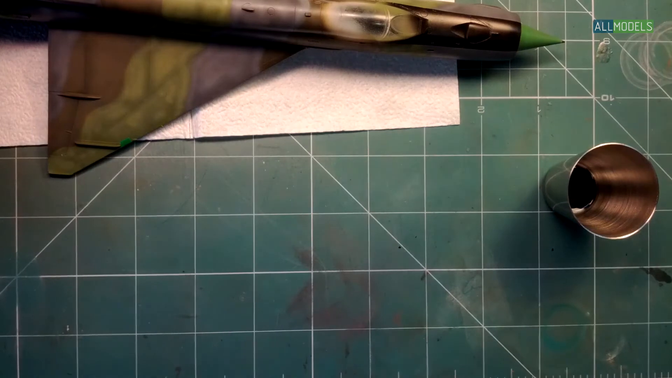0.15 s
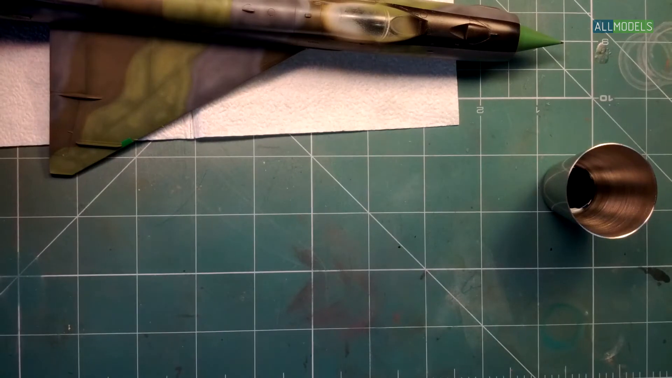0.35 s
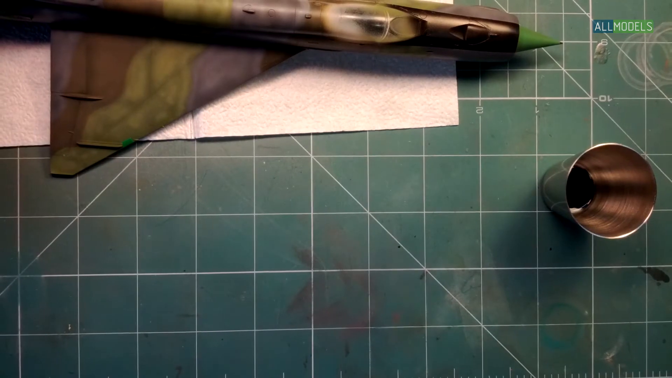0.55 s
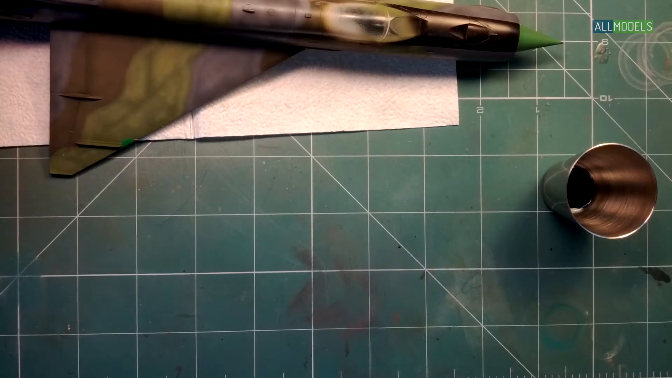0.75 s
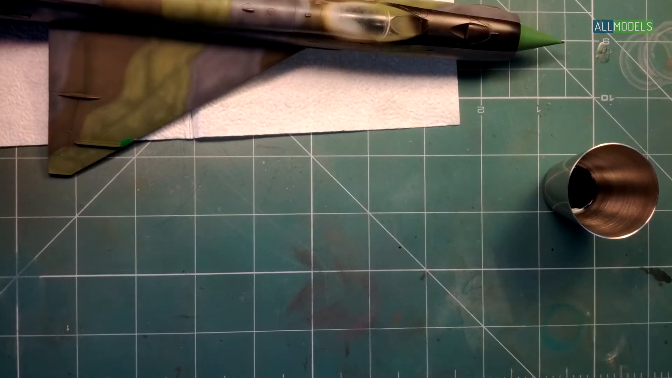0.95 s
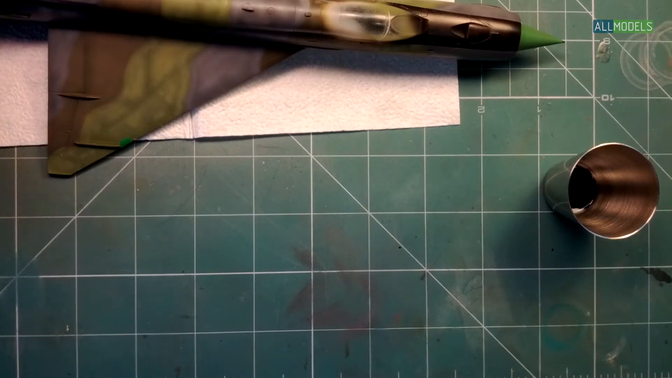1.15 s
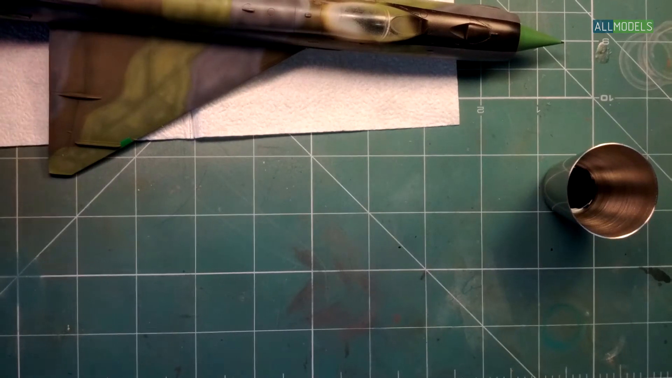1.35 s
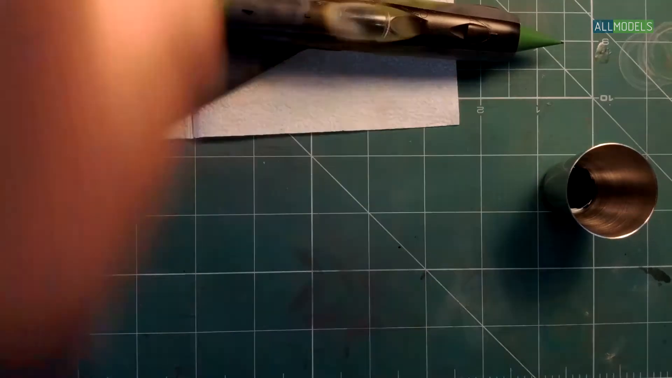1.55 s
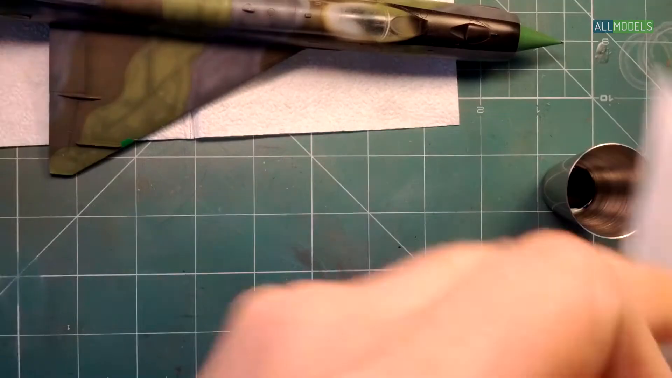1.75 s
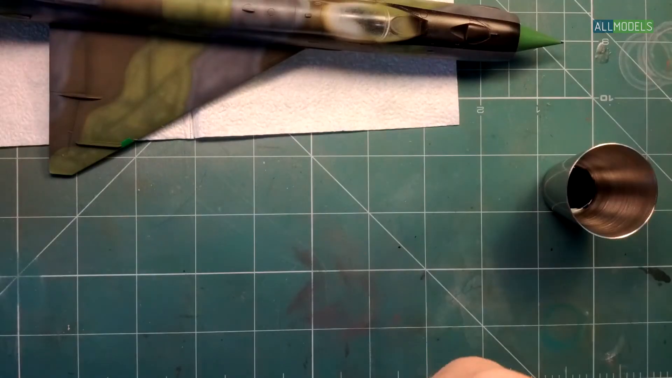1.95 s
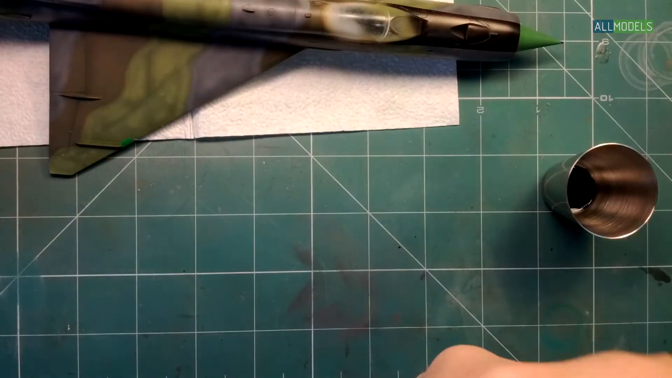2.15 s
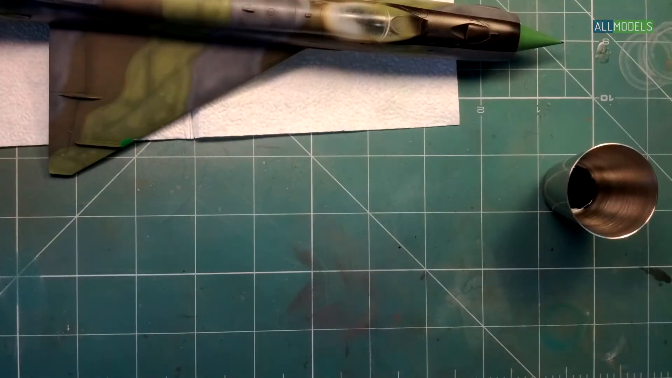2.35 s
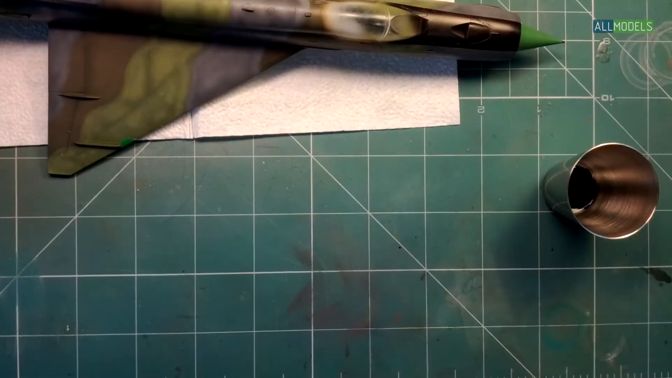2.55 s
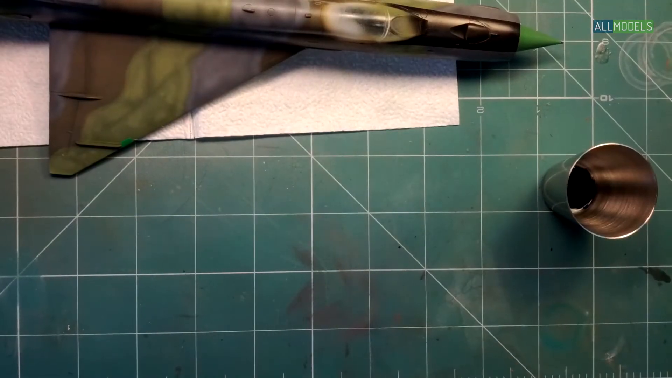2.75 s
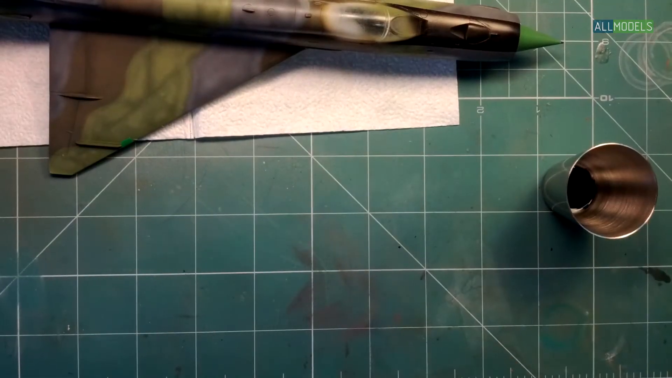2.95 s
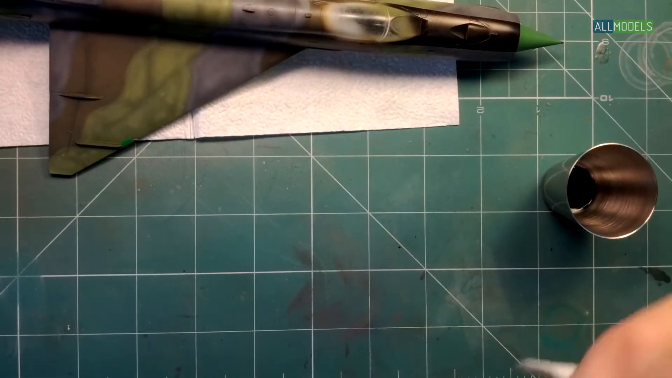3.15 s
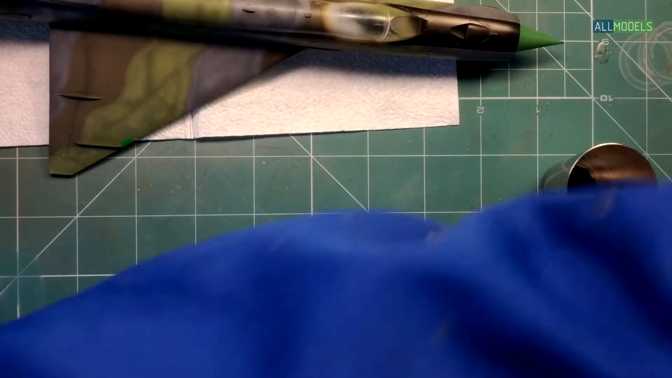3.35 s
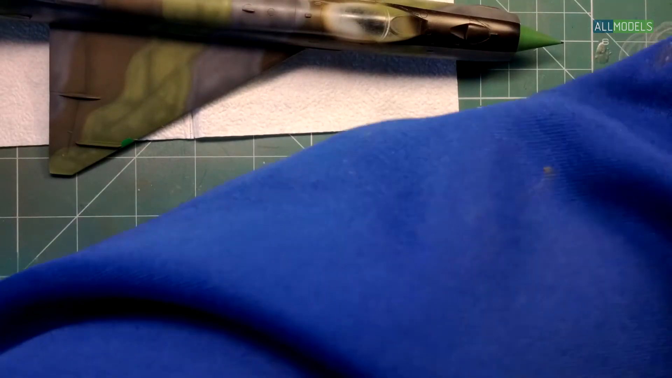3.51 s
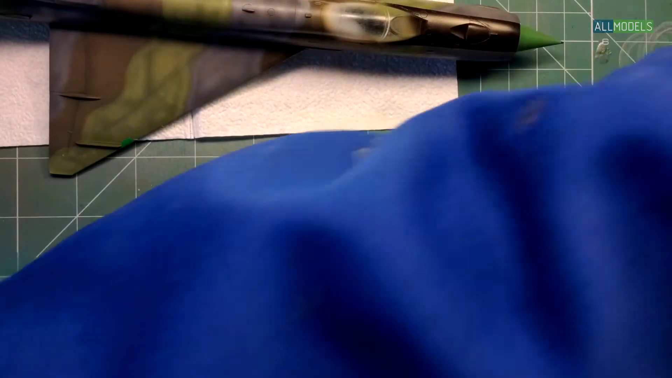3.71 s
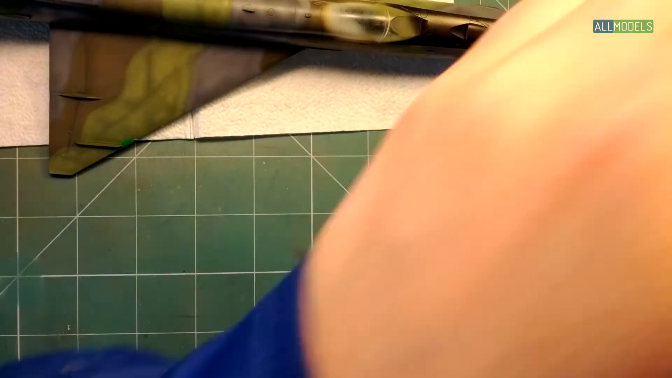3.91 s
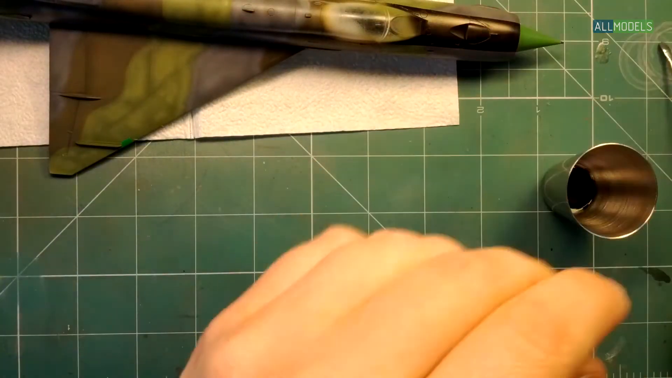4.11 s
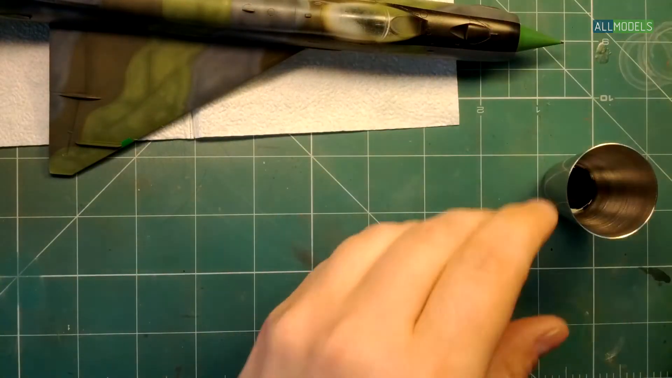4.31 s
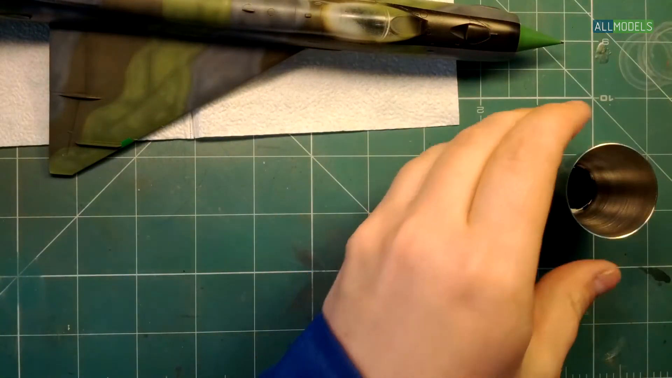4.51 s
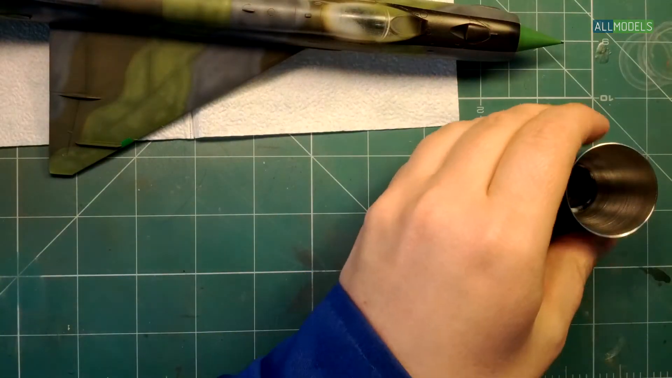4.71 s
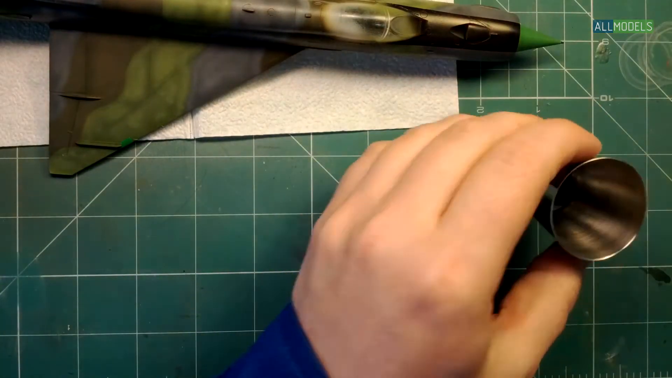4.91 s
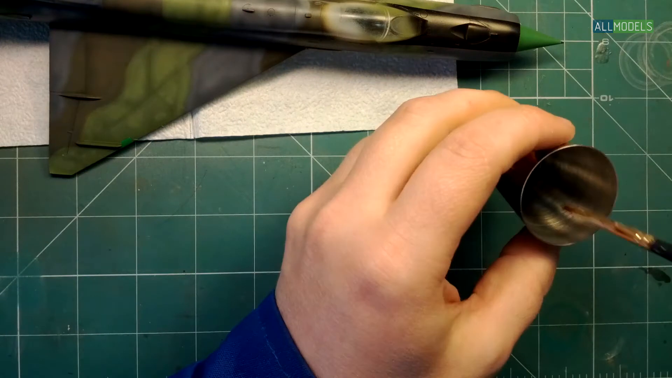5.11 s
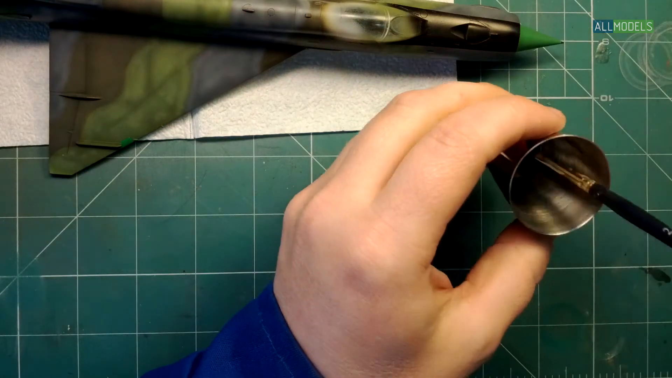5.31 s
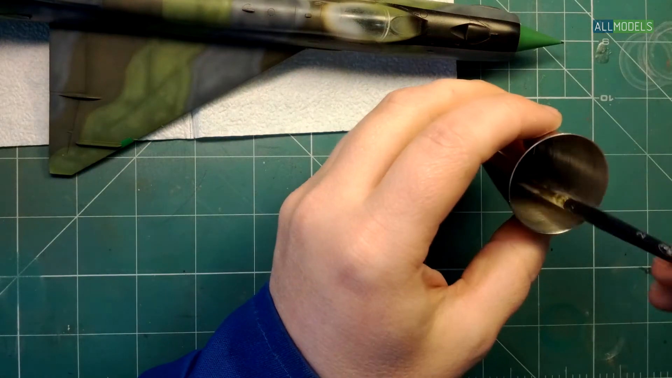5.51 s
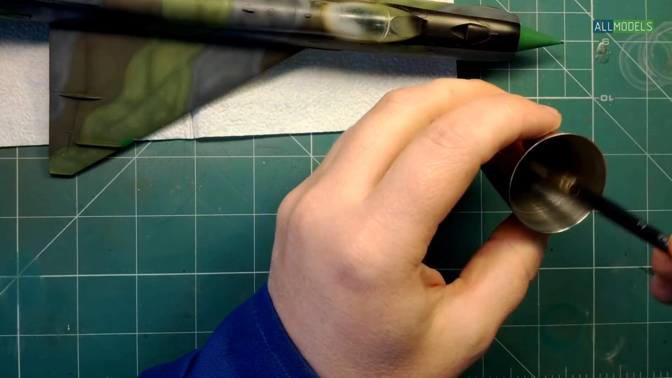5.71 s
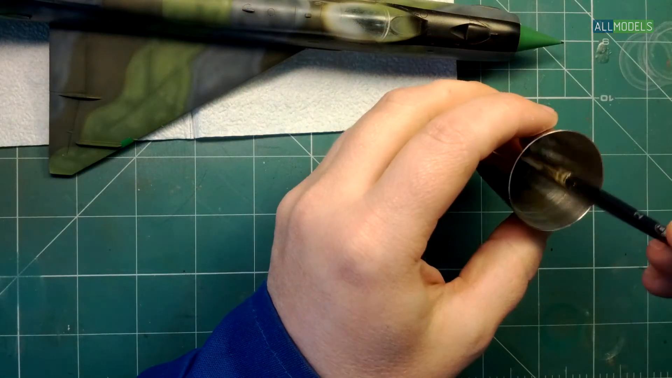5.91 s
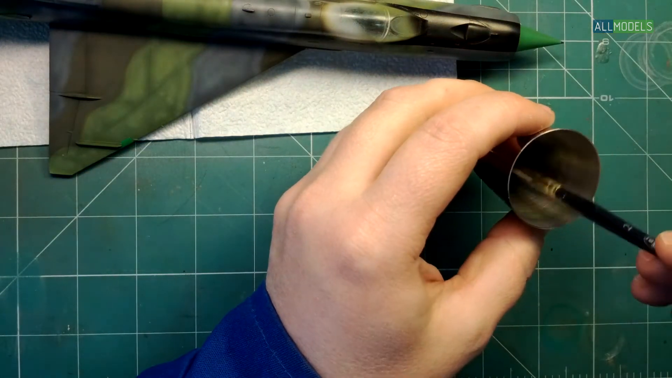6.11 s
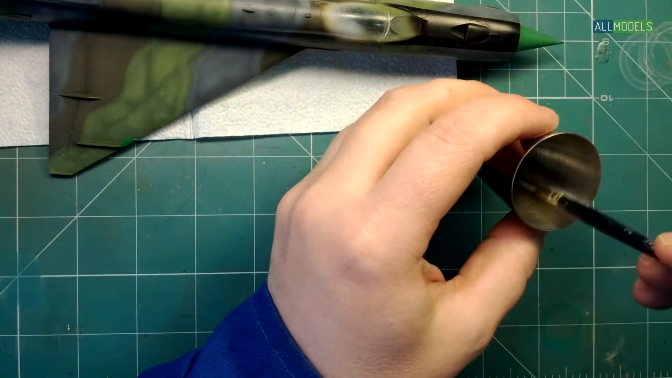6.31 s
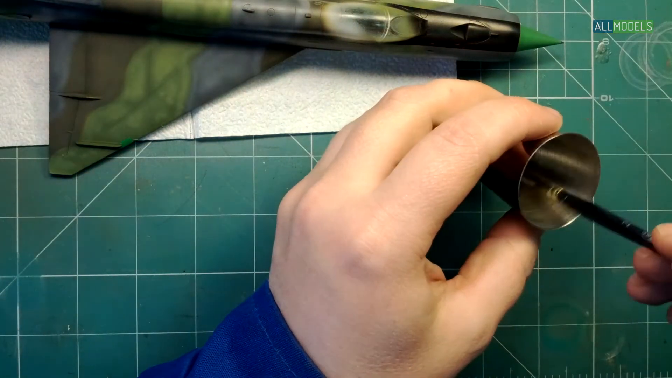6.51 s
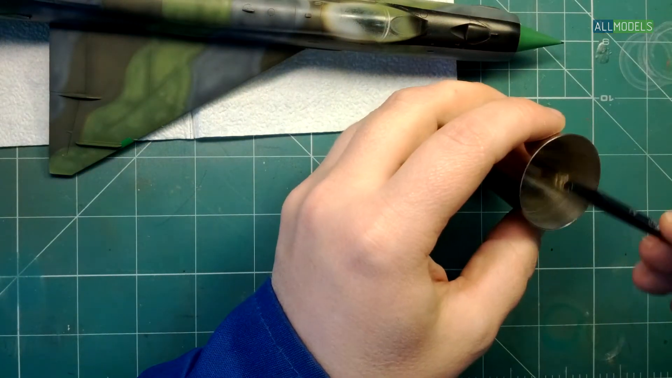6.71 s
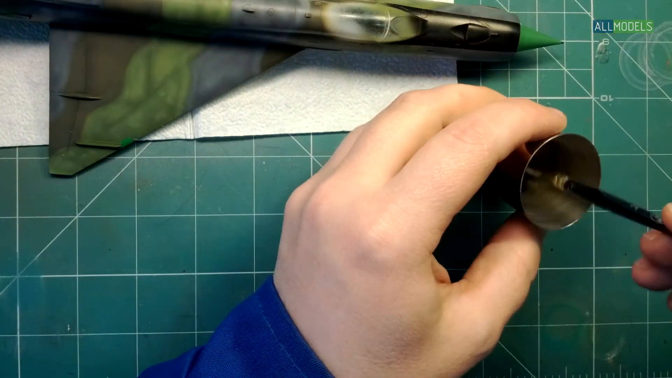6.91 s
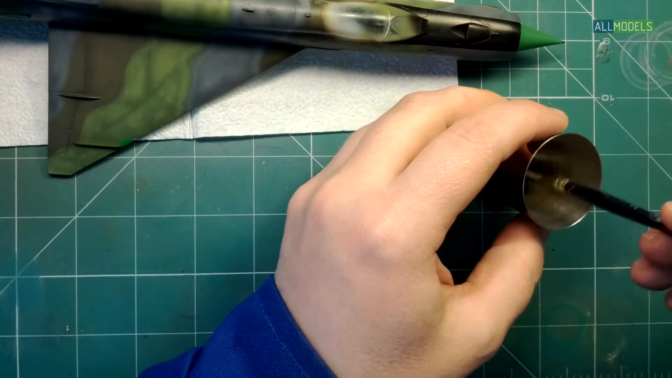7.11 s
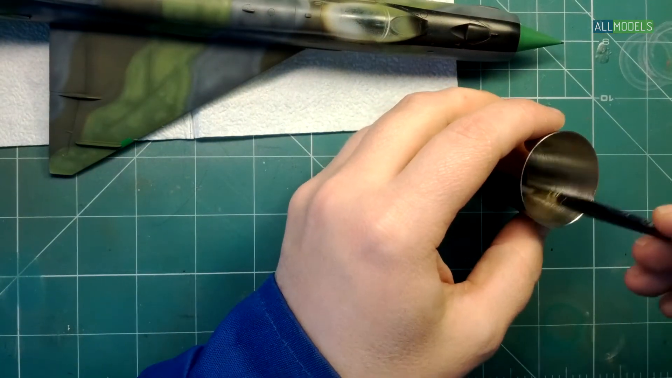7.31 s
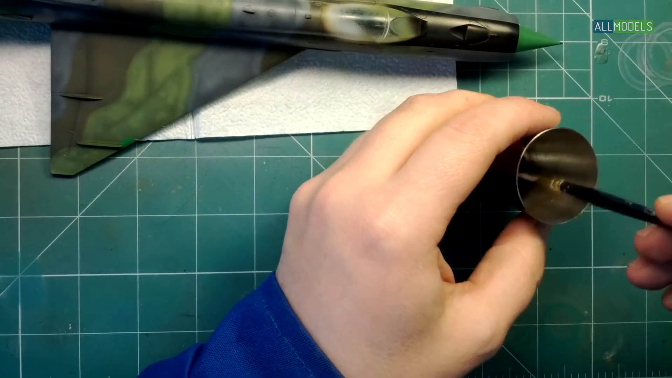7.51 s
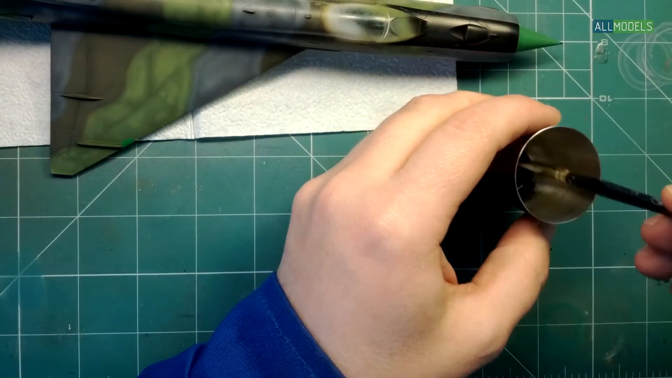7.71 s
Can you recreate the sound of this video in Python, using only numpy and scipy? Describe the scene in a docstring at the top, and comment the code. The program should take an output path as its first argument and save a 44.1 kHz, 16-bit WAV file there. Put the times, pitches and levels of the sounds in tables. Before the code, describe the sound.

Faint rustles and clicks, a tool bouncing on a desktop, then scratchy brush strokes with light clinks in a metal cup.

```python
"""A hobby desk in a quiet room. Paper and sleeves rustle, a small box slides over the mat, handled things
snap, and leaning arms set the desk humming. At 3.7 s a small tool drops and bounces: the desk rings, the
tool rattles, its steel tip pings. From 5.1 s a brush scrubs round a hand-held steel cup: slipping bristles
excite the wall and the ferrule ticks against it. Near 6 s a chair joint slips with a faint creak."""
import sys
import numpy as np
from scipy import signal
from scipy.fft import rfft, irfft
from scipy.io import wavfile
from scipy.ndimage import uniform_filter1d

SR = 44100
rng = np.random.default_rng(int(sys.argv[2]) if len(sys.argv) > 2 else 0)


def waveform_to_disk(signal):
    """Save audio, clipped to [-1, 1], as 16-bit WAV at the path in sys.argv[1]."""
    frames = np.transpose(np.atleast_2d(signal))
    scaled = np.clip(frames, -1, 1) * 32767
    samples = np.round(scaled).astype(np.int16)
    wavfile.write(sys.argv[1], SR, samples)


N = 342216

# steel cup wall modes: f/Hz, width/Hz, gain/dB
CUP_MODES = [(1815, 170, -21.5), (5230, 920, -12), (5490, 340, 2), (5690, 200, -0.5), (7000, 430, -26.5),
             (10800, 850, -9), (10916, 230, 4), (11206, 290, 4.5), (11750, 400, -11)]


def gain(db):
    return 10 ** (np.asarray(db) / 20)


def unit_rms(x):
    return x / np.sqrt(np.mean(x ** 2) + 1e-20)


def add(mix, start_s, sound):
    part = mix[round(start_s * SR):][:len(sound)]
    part += sound[:len(part)]


def log_interp(points, hz):
    """Interpolates (f/Hz, value) points over log frequency."""
    points_hz, values = np.transpose(points)
    return np.interp(np.log(hz + 1), np.log(points_hz + 1), values)


def coloured(x, spectrum):
    """x filtered by (f/Hz, level/dB) points, rms 1."""
    hz = np.fft.rfftfreq(len(x), 1 / SR)
    return unit_rms(irfft(rfft(x) * gain(log_interp(spectrum, hz)), len(x)))


def envelopes(gestures):
    """One power-summed gain curve per level column. Full at t; rise and fall each span 25 dB."""
    t, power = np.arange(N) / SR, 0
    for full_s, rise_s, hold_s, fall_s, *levels_db in gestures:
        ramp = np.minimum((t - full_s) / rise_s, (full_s + hold_s - t) / fall_s)
        shape_db = np.clip(25 * ramp, -200, 0)
        power = power + gain(np.add.outer(levels_db, shape_db)) ** 2
    return np.sqrt(power)


def grit(rate_hz, spread_db):
    """Tiny slips at random times, a few much larger than the rest."""
    size = gain(spread_db * np.minimum(rng.exponential(1, N), 4))
    return size * rng.standard_normal(N) * (rng.random(N) < rate_hz / SR)


def clumps(spread_db, samples):
    """Random gain: friction comes in uneven bunches."""
    return gain(spread_db * unit_rms(uniform_filter1d(rng.standard_normal(N), samples)))


def resonate(x, modes):
    """Parallel resonances (f/Hz, width/Hz, gain/dB), each applied twice for steep flanks."""
    out = np.zeros(N)
    for hz, width_hz, db in modes:
        r = np.exp(-np.pi * width_hz / SR)
        section = [1 - r, 0, r - 1, 1, -2 * r * np.cos(2 * np.pi * hz / SR), r * r]
        out += gain(db) * signal.sosfilt([section, section], x)
    return out


def ring(modes, detune=0.):
    """Decaying sines of a struck body, peak 1; each blow lands elsewhere, so the modes scatter."""
    scatter_db, attack_s = 2.5, 0.0006
    t, x = np.arange(SR // 2) / SR, 0
    for hz, db, t60_s in modes:
        db += scatter_db * rng.standard_normal()
        hz *= 1 + detune * rng.standard_normal()
        x = x + gain(db - 60 * t / t60_s) * np.sin(2 * np.pi * hz * t)
    x *= 1 - np.exp(-t / attack_s)
    return x / abs(x).max()


def crack(spectrum, t60_s):
    """Noise burst standing for many short modes, peak 1."""
    t = np.arange(4096) / SR
    x = coloured(rng.standard_normal(len(t)), spectrum) * gain(-60 * t / t60_s)
    return np.pad(x / abs(x).max(), (0, SR // 2 - len(t)))


def brush_scrub():
    """Bristles slip over steel, hiss and excite the cup wall; they drag lightly between strokes."""
    # t/s, rise/s, hold/s, fall/s, drive/dB, upper modes re drive/dB, hiss re drive/dB
    strokes = [(5.166, 0.038, 0.0083, 0.012, -52.5, 5, -4), (5.248, 0.0039, 0.031, 0.024, -49.5, 13.5, 0),
               (5.371, 0.016, 0.026, 0.038, -48.5, -5, -2), (5.408, .03, 0.013, 0.04, -55, 8, -12),
               (5.452, 0.022, 0.067, 0.032, -47, 2, -2), (5.59, 0.059, 0.03, 0.064, -44.5, 0, -4.5),
               (5.78, 0.02, 0.019, 0.074, -42, -0.5, -5), (5.982, 0.031, 0.037, 0.021, -49, 7.5, 0.5),
               (6.095, 0.025, 0.026, 0.063, -48, 3.5, -3.5), (6.172, .05, 0.065, .03, -65.5, 6, 5.5),
               (6.301, 0.021, 0.046, 0.018, -49, 6.5, -3.5), (6.373, .03, 0.086, 0.071, -67.5, 13.5, 8),
               (6.506, 0.025, 0.1, 0.066, -50, 7, -2.5), (6.714, 0.053, 0.021, 0.048, -48, 5, -3),
               (6.775, .04, .05, 0.059, -67, 11.5, 3), (6.877, 0.029, 0.011, 0.036, -45, 0.5, -5.5),
               (6.982, .05, 0.026, 0.057, -61.5, 9, 1), (7.077, 0.023, 0.017, 0.015, -52.5, 11.5, 0),
               (7.191, 0.11, 0.043, .05, -63.5, 9.5, 2.5), (7.25, 0.046, 0.031, 0.037, -48, 0, -4),
               (7.41, 0.053, .035, .08, -54, 6, -4), (7.622, 0.029, 0.025, 0.06, -45, 3.5, -4)]
    bristle_spectrum = [(3000, -28), (4500, -30), (6500, 0.5), (7800, -4.5), (9300, 1), (12500, 4),
                        (14000, 2.5), (16000, -3)]  # f/Hz, level/dB
    drag_db, drag_from_s = (-78, -90, -74), 5.12  # drive floor: lower modes, upper modes, hiss
    drive = envelopes([(*timing, db, db + upper_db, db + hiss_db)
                       for *timing, db, upper_db, hiss_db in strokes])
    drag = np.outer(gain(drag_db), np.arange(N) / SR > drag_from_s)
    lower_drive, upper_drive, hiss_drive = np.maximum(drive, drag)
    slips = unit_rms(grit(rate_hz=14000, spread_db=1.04) * clumps(spread_db=2.8, samples=200))
    lower = gain(14) * resonate(lower_drive * slips, CUP_MODES[:5])
    upper = gain(10) * resonate(upper_drive * slips, CUP_MODES[5:])
    hiss = gain(2.5) * hiss_drive * coloured(slips, bristle_spectrum)
    return lower + upper + hiss


def ferrule_ticks():
    """The ferrule hits the cup: a bright crack and a small thud, both ringing the wall."""
    hits = [(5.0748, -32, -5.5), (5.177, -39.5, -10), (5.249, -30, -43), (5.9897, -40, -17),
            (6.0357, -21.5, -32), (6.198, -40, -25), (6.2518, -29, -40), (6.4147, -27, -22.5),
            (6.421, -29, -21), (6.4357, -33, -34), (6.545, -42, -35), (6.556, -44, -34),
            (7.667, -15, -29.5)]  # t/s, level/dB, thud re level/dB
    ferrule_spectrum = [(1760, -67), (3000, -35.5), (5740, -14.5), (6300, -10), (6810, -19), (8320, -11),
                        (9130, -4), (12100, -12), (13600, -3.5), (14400, -2), (16500, -33)]  # f/Hz, level/dB
    thud_modes = [(960, -8, 0.015), (1840, 0, 0.02), (2600, -6, 0.014), (3300, 0, 0.012), (4200, -3, 0.012)]  # cup in the hand: f/Hz, level/dB, t60/s
    out = np.zeros(N)
    for start_s, db, thud_db in hits:
        tick = crack(ferrule_spectrum, t60_s=0.022)
        thud = gain(thud_db) * ring(thud_modes, detune=0.04)
        add(out, start_s, gain(db) * (tick + thud))
    return out + gain(-5.5) * resonate(out, CUP_MODES)


def tool_drop():
    """Each blow rings the desk and cracks and rattles the tool; its steel tip pings."""
    blows = [(3.687, -20, -5.5, -16), (3.7013, -22, -27, -21), (3.9116, -15, 11, -5.5),
             (3.969, -26, 7.5, 1.5), (3.974, -25, 0, -2), (3.982, -39.5, 14.5, 11), (4.0032, -24.5, 1, -10),
             (4.0472, -26, -14, -15), (4.0594, -35.5, -4, -14), (4.0742, -33, -4.5, -9),
             (4.1051, -40, -8, -7.5)]  # t/s, level/dB, crack re level/dB, rattle re level/dB
    desk_modes = [(93.1, -22, 0.059), (148, -24, 0.048), (240, -22.5, 0.077), (299, -26, 0.34),
                  (690, -17, .05), (1277, -24, 0.016), (1325, -4.5, 0.036), (1406, 0.5, 0.017),
                  (1630, -3, .03), (1795, -8, 0.035), (1950, 2.5, 0.018), (2094, -4, 0.019),
                  (2285, -1.5, 0.01)]  # f/Hz, level/dB, t60/s
    rattle_modes = [(3345, -4, .015), (3250, -2.5, .02), (3520, -10.5, 0.054), (3927, -8, 0.017)]  # f/Hz, level/dB, t60/s
    tool_spectrum = [(1470, -27), (2500, -4), (4560, -8), (5640, 2), (7320, -6), (8240, 2), (9270, -6),
                     (11200, 0.5), (12400, -5.5), (15600, -19), (16500, -30.5)]  # f/Hz, level/dB
    tip_pings = [(3.9125, -41, 13580, .13), (3.982, -47, 11150, .3), (4.003, -58, 13580, .16)]  # t/s, level/dB, f/Hz, t60/s
    out = np.zeros(N)
    for start_s, db, crack_db, rattle_db in blows:
        contact = gain(crack_db) * crack(tool_spectrum, t60_s=0.012)
        rattle = gain(rattle_db) * ring(rattle_modes, detune=0.02)
        desk = ring(desk_modes, detune=0.024)
        add(out, start_s, gain(db) * (desk + contact + rattle))
    for start_s, db, hz, t60_s in tip_pings:
        add(out, start_s, gain(db) * ring([(hz, 0, t60_s)]))
    return out


def rustle(bunches):
    """Paper and cloth: clumped crackle over a smoother, duller rubbing."""
    # t/s, rise/s, hold/s, fall/s, crackle/dB, treble re crackle/dB, rubbing/dB
    gestures = [(0.054, 0.28, 0.081, .1, -97, -2, -62), (0.145, 0.018, .01, 0.21, -60, -10, -43.5),
                (0.257, 0.095, 0.055, 0.16, -60, 4.5, -58), (0.465, 0.1, 0.15, 0.096, -52, 1.5, -56),
                (0.67, 0.055, 0.012, 0.48, -66.5, 6.5, -62), (0.964, 0.11, 0.049, 0.11, -59, 2, -60),
                (1.088, 0.079, 0.11, 0.063, -63, 6, -60.5), (1.316, 0.21, 0.044, 0.47, -61.5, 5, -62.5),
                (1.595, 0.086, 0.027, 0.078, -45.5, 6, -56), (1.721, 0.1, 0.031, 0.18, -50, 8.5, -61.5),
                (1.9, 0.081, 0.018, 0.18, -48, 7, -63), (2.061, 0.28, 0.044, 0.33, -58, 4.5, -66.5),
                (2.332, 0.14, 0.013, .3, -63.5, 8, -70), (2.486, .2, .04, .15, -66.5, 2, -67),
                (2.789, 0.045, 0.02, 0.09, -56, 3.5, -66.5), (2.856, 0.064, 0.015, .1, -52, 4.5, -57.5),
                (2.94, 0.12, .08, .2, -66, 7, -74), (3.07, 0.13, 0.095, 0.11, -59.5, 4, -70),
                (3.265, 0.12, 0.039, 0.22, -61, 3.5, -66), (3.433, 0.1, 0.013, 0.085, -59, 2.5, -75),
                (3.53, .1, 0.16, 0.078, -68, -1, -75)]
    crackle_spectrum = [(530, -18.5), (900, -15), (1130, -8.5), (2140, -8.5), (2350, -7), (3920, -5.5),
                        (12900, -4), (15700, -4.5), (16500, -25)]  # f/Hz, level/dB
    rubbing_spectrum = [(88, -22), (150, -10), (338, -0.5), (385, 1.5), (595, 1.5), (1180, -3), (2150, -15),
                        (2500, -22), (3250, -20), (5500, -120)]  # f/Hz, level/dB
    body_gain, treble_gain, rubbing_gain = envelopes(
        [(*timing, db, db + treble_db, rubbing_db) for *timing, db, treble_db, rubbing_db in gestures])
    crackle = coloured(grit(rate_hz=9000, spread_db=1.3) * bunches, crackle_spectrum)
    body = signal.sosfilt(signal.butter(2, 7000, fs=SR, output="sos"), crackle)
    rubbing = coloured(rng.standard_normal(N) * bunches, rubbing_spectrum)
    return body_gain * unit_rms(body) + treble_gain * unit_rms(crackle - body) + rubbing_gain * rubbing


def handling_snaps():
    """Handled things snap: short bursts, steep below their centre, spreading above."""
    snaps = [(0.143, -61, 670, 0.014), (0.8224, -47, 3800, 0.009), (0.442, -42, 6000, .012),
             (0.598, -39, 5500, .012), (0.9155, -40, 10000, .008), (0.9528, -35.5, 8150, 0.0093),
             (0.966, -35, 11000, .008), (0.97, -25, 12500, .008), (1.01, -35, 12500, .012),
             (1.027, -36, 12500, .012), (1.052, -38, 12000, .012), (1.1644, -38.5, 5440, 0.02),
             (1.198, -45, 1500, 0.012), (1.8912, -24, 9600, 0.015), (2.0754, -34.5, 7400, 0.026),
             (2.162, -44, 8600, 0.015), (2.2213, -49, 1450, 0.011), (2.236, -47, 3040, 0.021),
             (2.487, -49, 1180, 0.017), (2.589, -39, 676, 0.02), (2.622, -36.5, 725, 0.023),
             (2.639, -43, 730, 0.015), (2.669, -40.5, 690, 0.024), (2.744, -42.5, 670, 0.022),
             (2.794, -34.5, 9350, 0.018), (2.8709, -32, 9400, 0.021), (3.0545, -41, 9500, 0.015),
             (3.273, -35.5, 1870, 0.013), (3.3824, -56, 1660, 0.012), (3.6058, -30, 9600, 0.022),
             (4.406, -45, 1300, 0.015), (5.799, -58, 935, 0.04), (5.831, -46.5, 650, 0.018)]  # t/s, level/dB, f/Hz, t60/s
    out = np.zeros(N)
    for start_s, db, hz, t60_s in snaps:
        spectrum = [(hz / 3.2, -35), (hz / 0.95, 0), (hz * 1.6, -4), (hz * 3.4, -20)]
        add(out, start_s, gain(db) * crack(spectrum, t60_s))
    return out


def box_slide(bunches):
    """Friction on the mat excites a small box."""
    slide = [(.47, 0.044, 0.138, 0.036, -53)]  # t/s, rise/s, hold/s, fall/s, level/dB
    box_modes = [(1160, 120, -4.5), (2430, 110, -3.5), (3870, 330, 0), (4370, 200, -3), (5000, 150, -9.5)]  # f/Hz, width/Hz, gain/dB
    slips = grit(rate_hz=3000, spread_db=2.3) * bunches
    return envelopes(slide)[0] * unit_rms(resonate(slips, box_modes))


def desk_hum():
    """Arms moving on the desk top drive its low modes with noise."""
    arm_moves = [(1.0, 0.1, 0.29, 0.6, -61.5), (2.12, .15, 0.045, .12, -69.5),
                 (2.46, 0.23, 0.42, .15, -66.5), (3.22, 0.38, 0.097, .15, -69),
                 (3.46, .08, 0.013, 0.065, -59), (3.62, 0.084, 0.85, 0.34, -66),
                 (4.7, 0.15, 0.28, 0.37, -73.5), (5.17, .15, .12, .15, -82),
                 (5.47, 0.092, 0.022, 0.071, -71)]  # t/s, rise/s, hold/s, fall/s, level/dB
    hum = resonate(rng.standard_normal(N), [(287, 83, -5), (240, 66, -9)])
    return envelopes(arm_moves)[0] * unit_rms(hum)


def chair_creak():
    """A joint slips at an uneven pace; a weaker slip follows each one."""
    pushes = [(6.02, 0.11, 0.22, 0.059, -66.5), (6.3, .04, .36, 0.22, -65.5)]  # t/s, rise/s, hold/s, fall/s, level/dB
    chair_modes = [(398, 9, 0.075), (556, 10, 0.06), (671.5, 6.5, 0.11), (810, -33, 0.017)]  # f/Hz, level/dB, t60/s
    mean_rate_hz, follow_s = 50, 0.00812
    rate_hz = mean_rate_hz * (1 + 0.55 * uniform_filter1d(rng.standard_normal(N), 400))
    slip_count = np.floor(np.cumsum(rate_hz) / SR)
    slips = (np.diff(slip_count, prepend=0) > 0) * gain(1.6 * rng.standard_normal(N))
    slips += 0.47 * np.roll(slips, round(follow_s * SR))
    creak = signal.oaconvolve(slips, ring(chair_modes))[:N]
    return envelopes(pushes)[0] * unit_rms(creak)


def room_echoes(x):
    """Sparse reflections of random sign, each band dying at its own rate."""
    decay = [(200, 0.44), (660, 0.63), (1500, 0.44), (2500, .3), (3500, 0.23), (10000, 0.1), (16000, 0.34)]  # f/Hz, t60/s
    taps = np.zeros(SR)
    slots = np.arange(150, SR - 20, 20)
    taps[slots + rng.integers(0, 20, len(slots))] = rng.choice([-1., 1.], len(slots))
    hz, t, bands = signal.stft(taps, SR, nperseg=256)
    t60_s = log_interp(decay, hz)[:, None]
    tail = signal.istft(bands * gain(-60 * t / t60_s), SR, nperseg=256)[1]
    return signal.fftconvolve(x, tail / np.linalg.norm(tail))[:N]


def room_tone():
    """Low rumble of the house and a faint hiss."""
    spectrum = [(12, -24), (30, -5.5), (52, 2), (75, -2.5), (110, -8), (150, -18.5), (273, -22),
                (492, -24.5), (1650, -29.5), (4410, -31), (6910, -31), (12500, -25), (15200, -26),
                (16500, -27.5)]  # f/Hz, level/dB
    return gain(-58) * coloured(rng.standard_normal(N), spectrum)


def scene():
    """Mono mix; only the impacts feed the echoes."""
    drop, ticks, snaps = tool_drop(), ferrule_ticks(), handling_snaps()
    echoes = room_echoes(gain(-9) * drop + gain(-9.5) * ticks + gain(-7) * snaps)
    scrub = brush_scrub()
    bunches = clumps(spread_db=1.8, samples=220)
    handling = rustle(bunches) + box_slide(bunches)
    background = desk_hum() + chair_creak() + room_tone()
    return (scrub + ticks + drop + handling + snaps + echoes + background)[None]


def record(dry):
    """Steep low-pass."""
    cutoff_hz = 15850
    lowpass = signal.firwin(511, cutoff_hz, window=("kaiser", 9), fs=SR)
    return signal.oaconvolve(dry, lowpass[None], "same")


dry = scene()
out = record(dry)
waveform_to_disk(out)
```